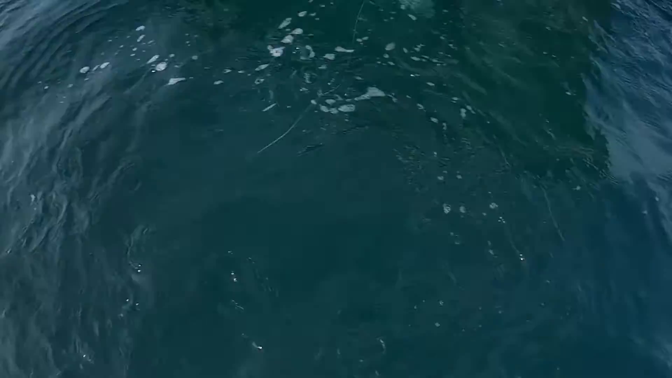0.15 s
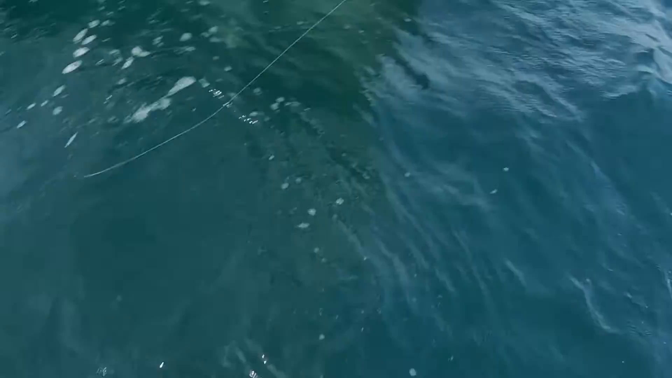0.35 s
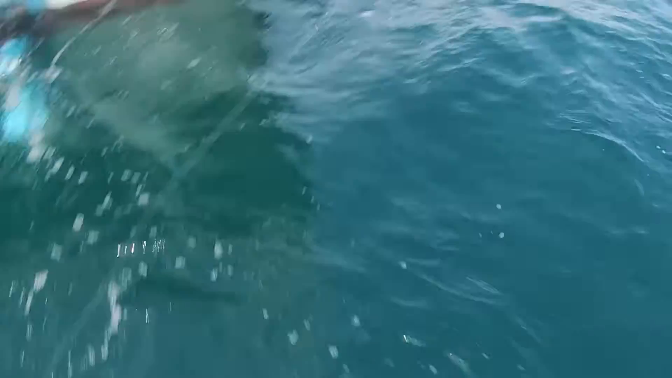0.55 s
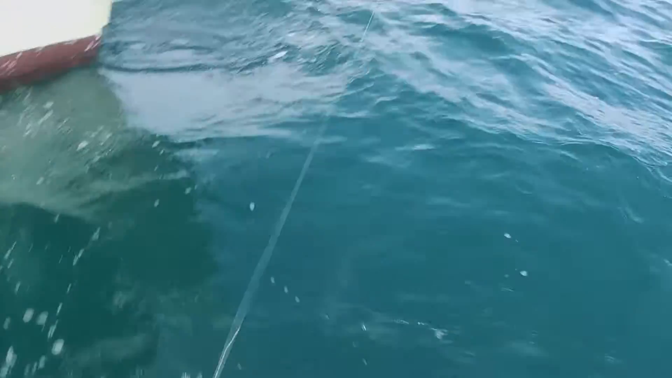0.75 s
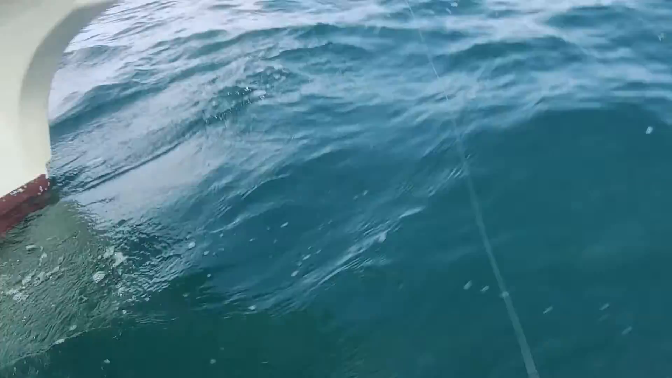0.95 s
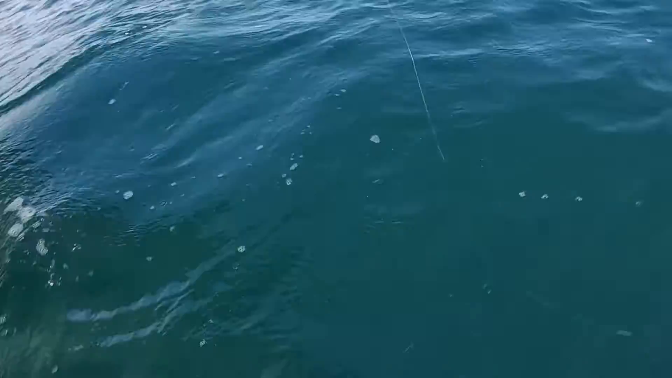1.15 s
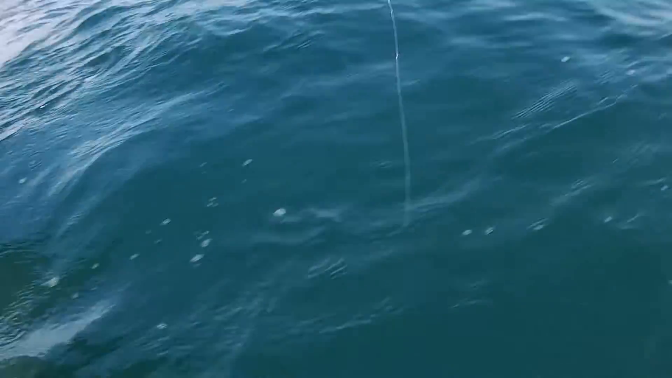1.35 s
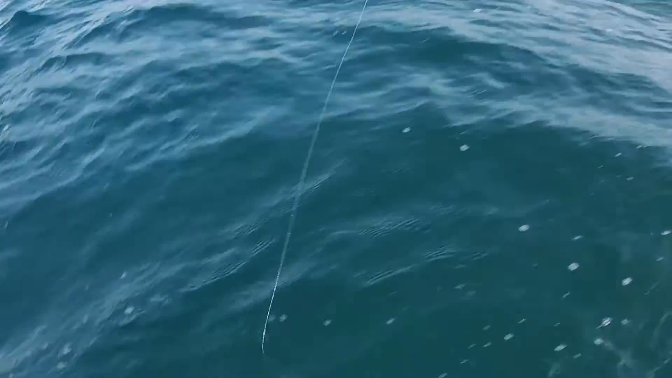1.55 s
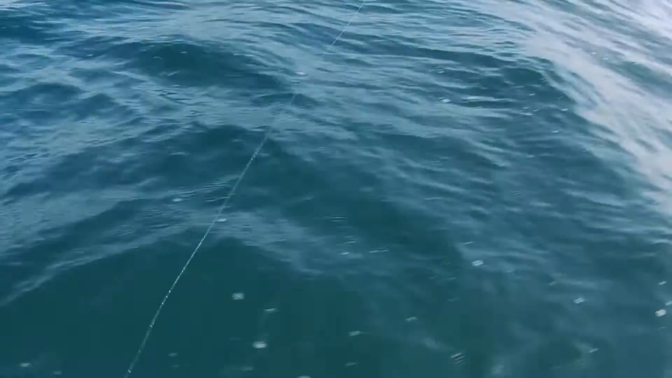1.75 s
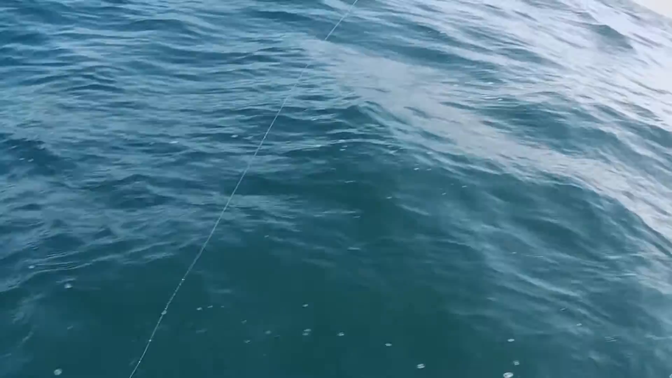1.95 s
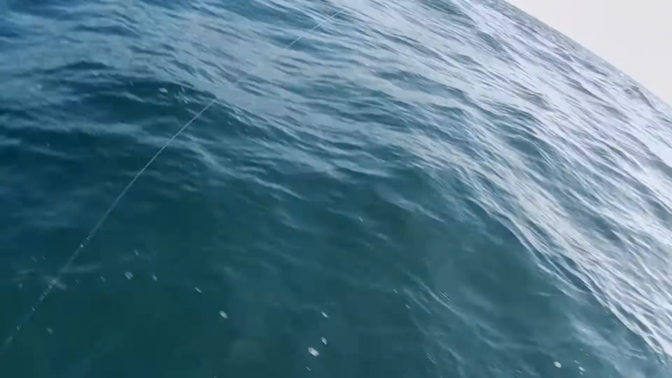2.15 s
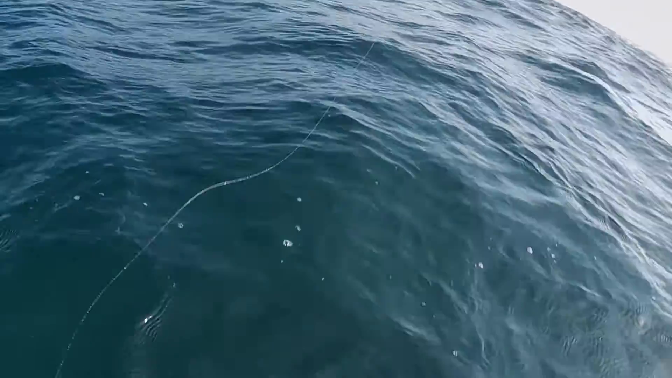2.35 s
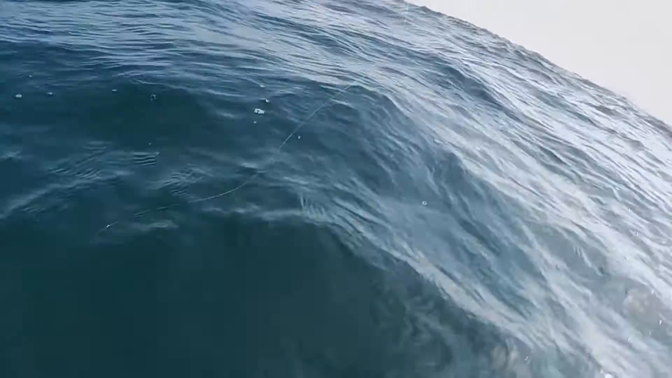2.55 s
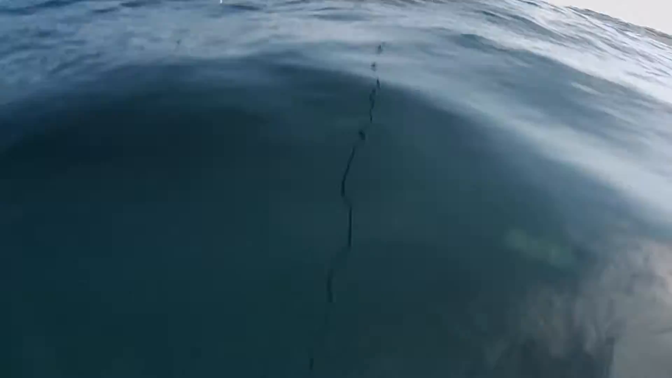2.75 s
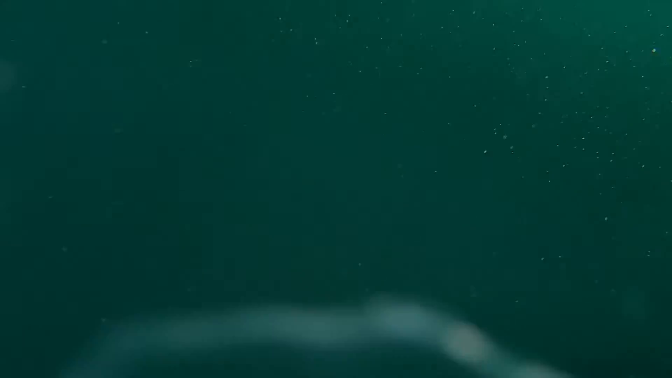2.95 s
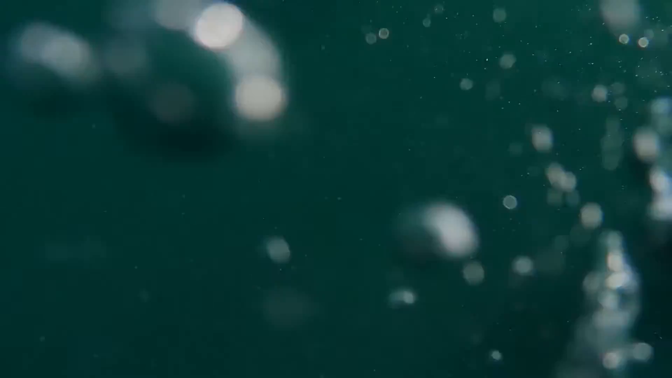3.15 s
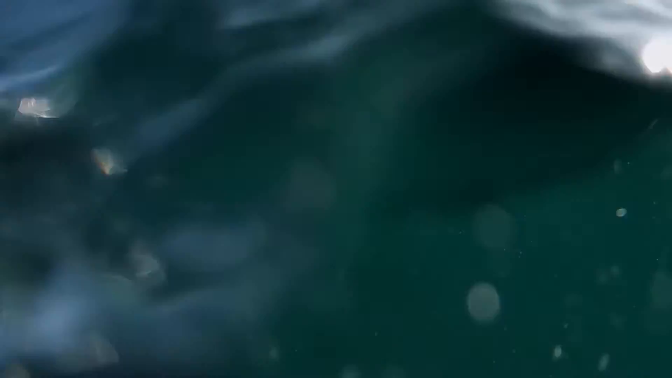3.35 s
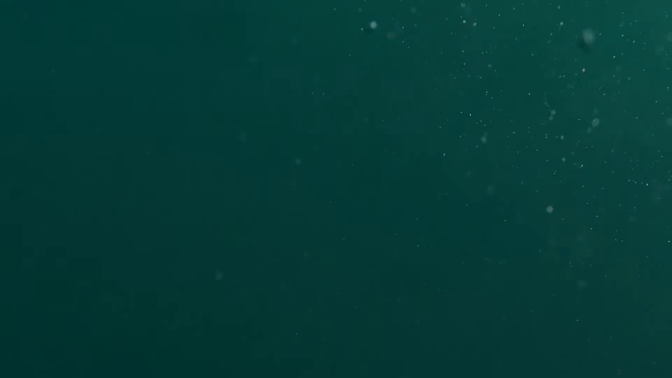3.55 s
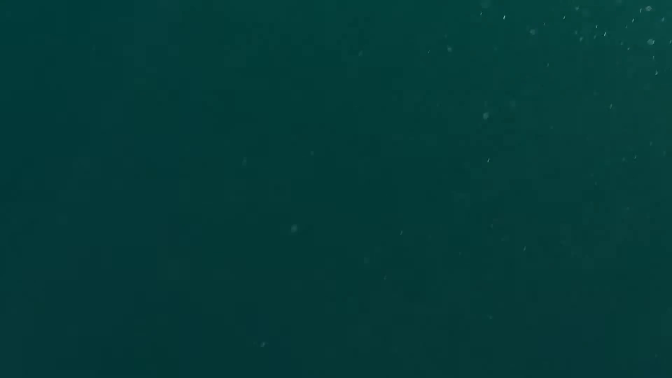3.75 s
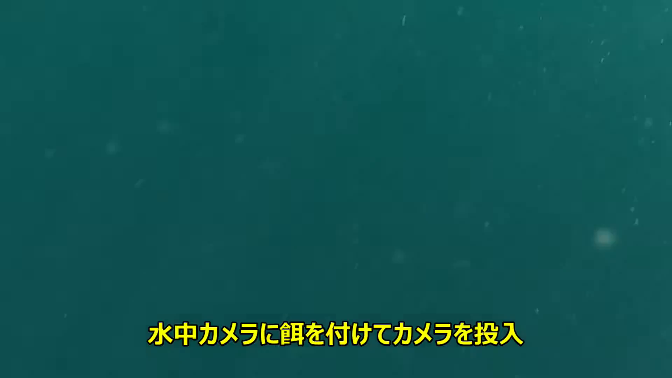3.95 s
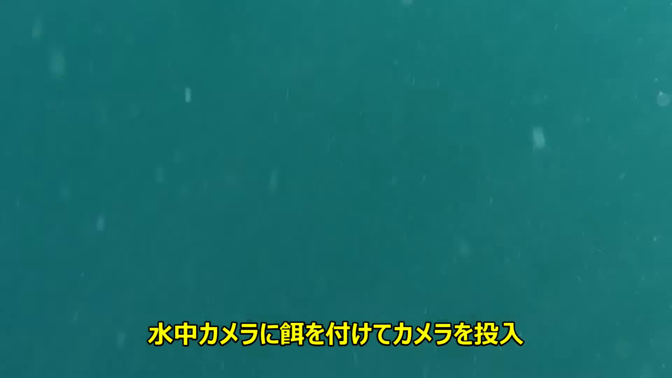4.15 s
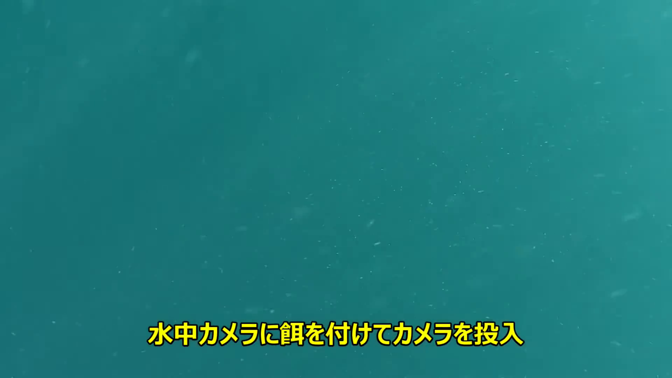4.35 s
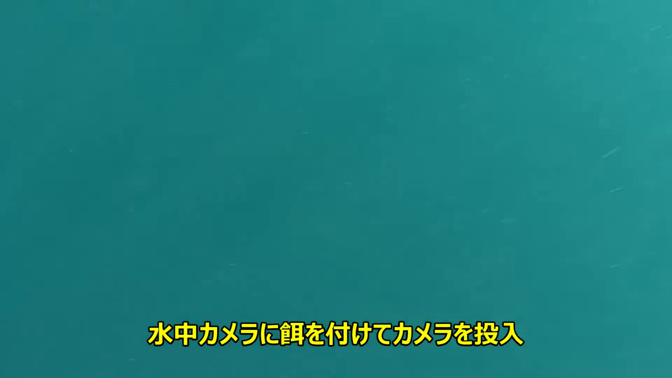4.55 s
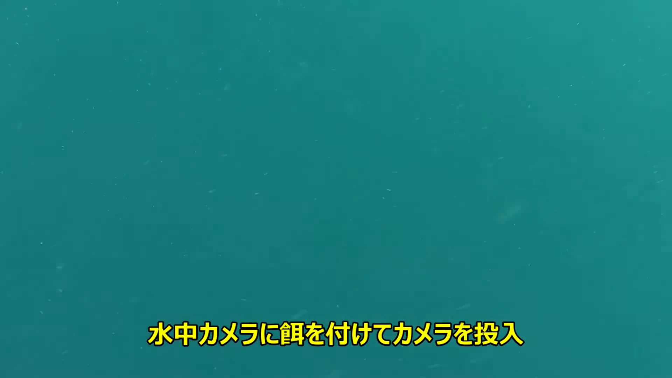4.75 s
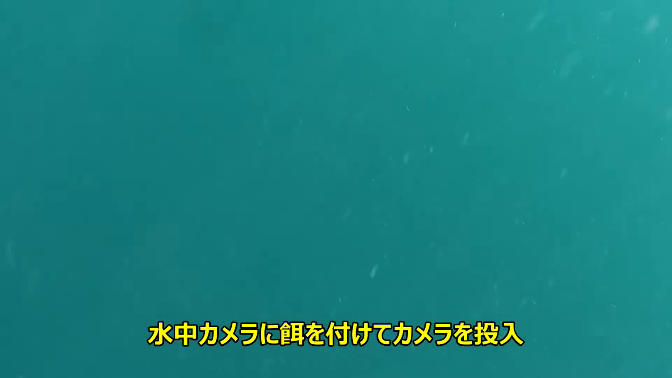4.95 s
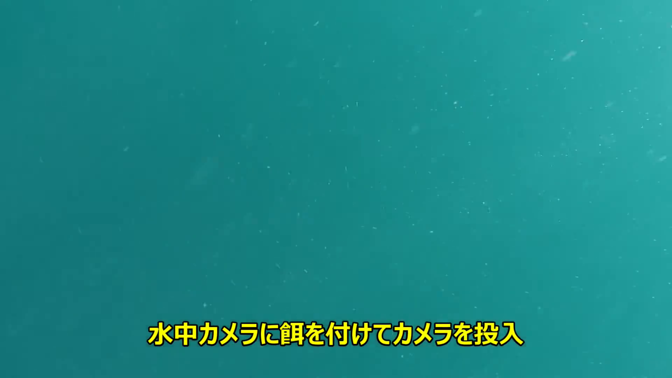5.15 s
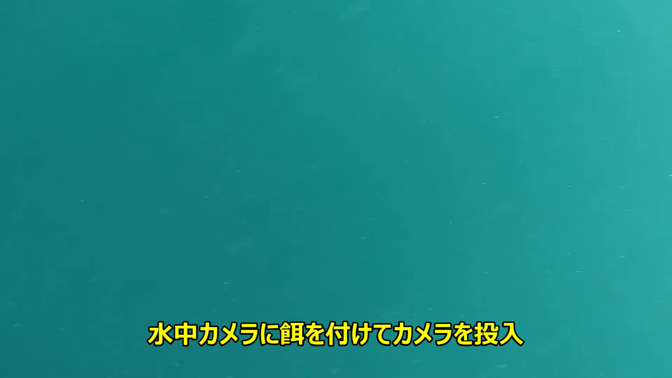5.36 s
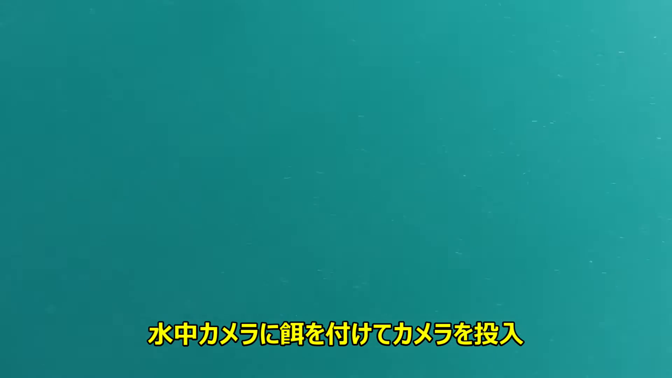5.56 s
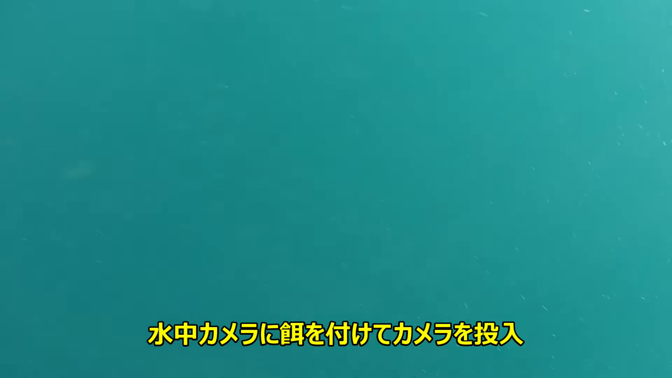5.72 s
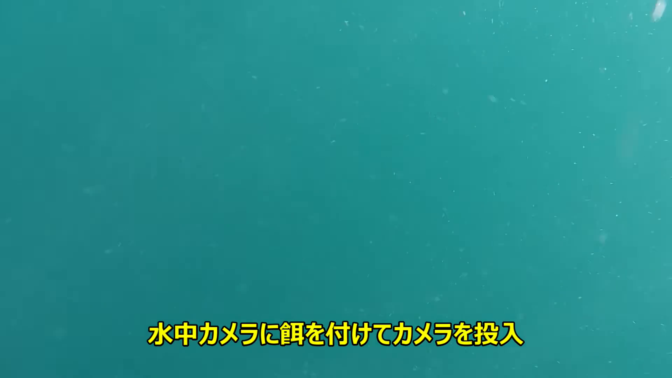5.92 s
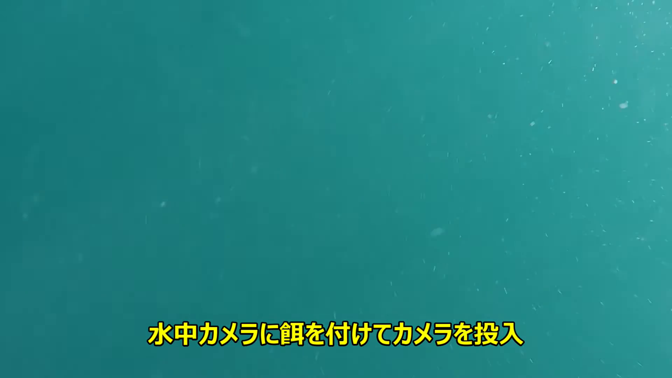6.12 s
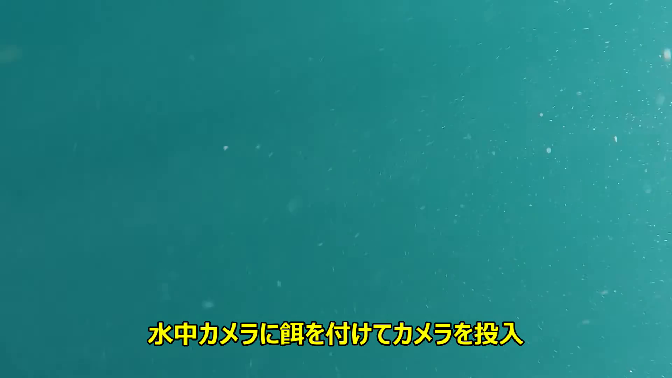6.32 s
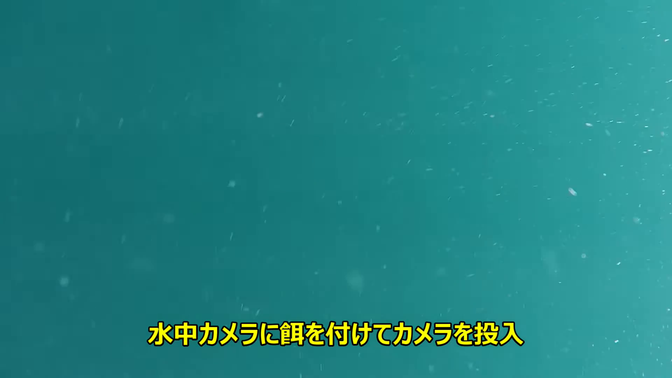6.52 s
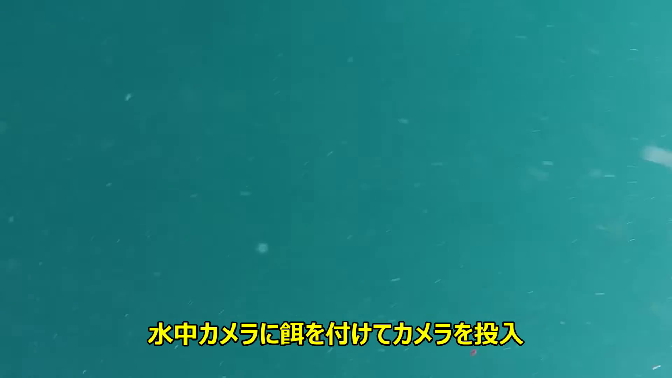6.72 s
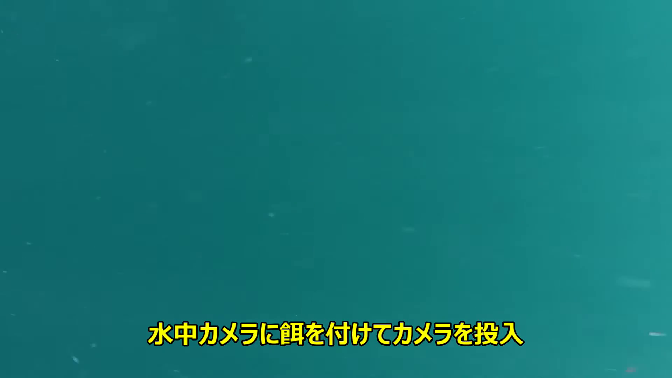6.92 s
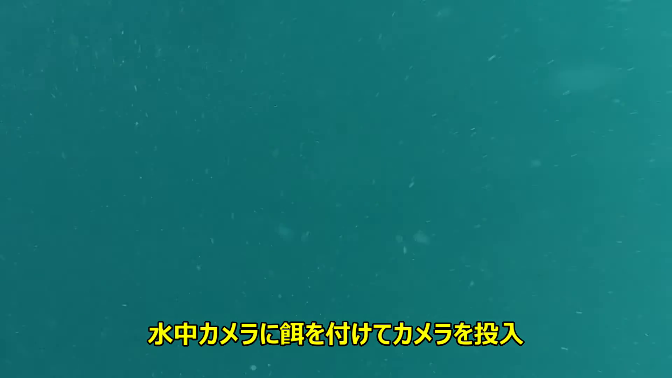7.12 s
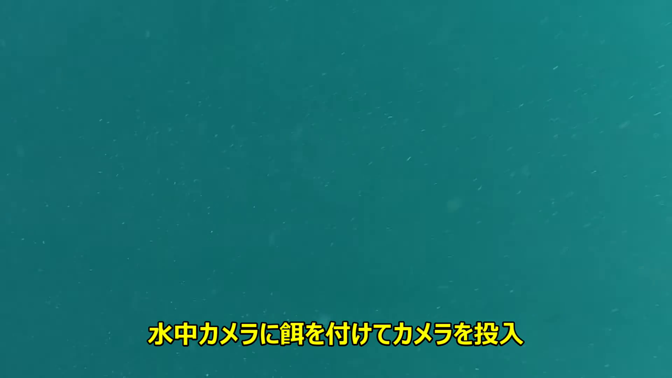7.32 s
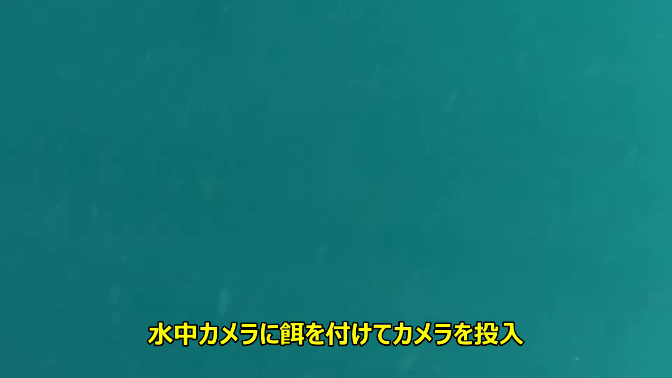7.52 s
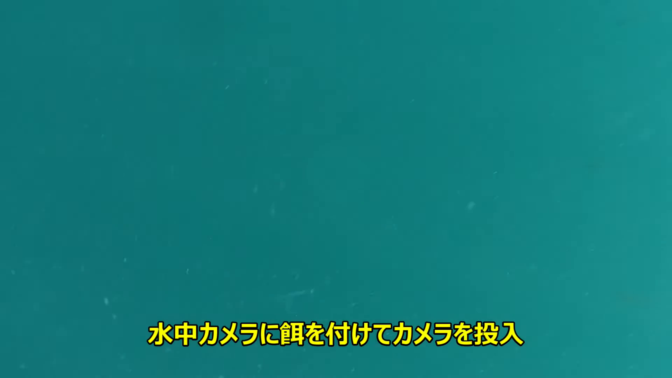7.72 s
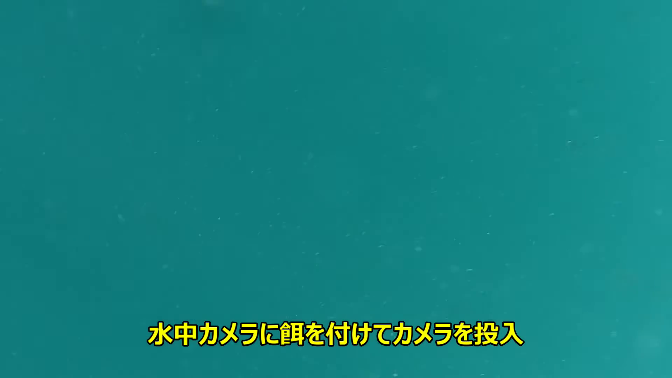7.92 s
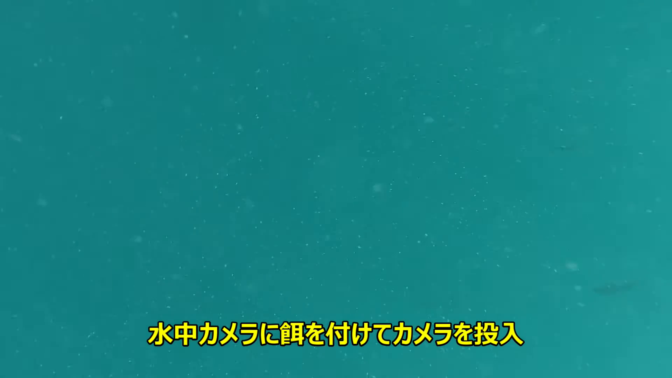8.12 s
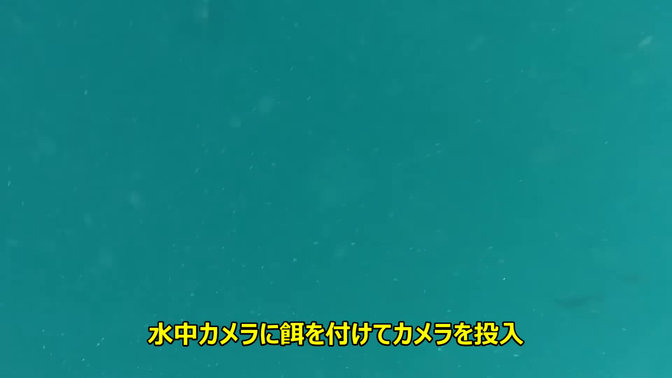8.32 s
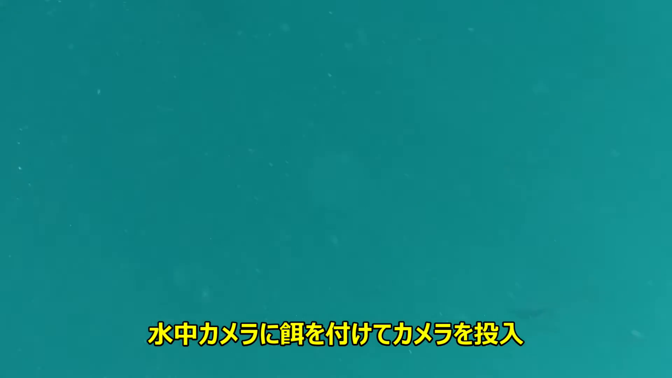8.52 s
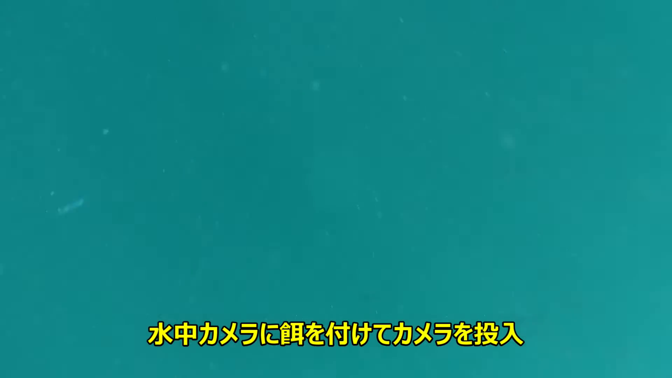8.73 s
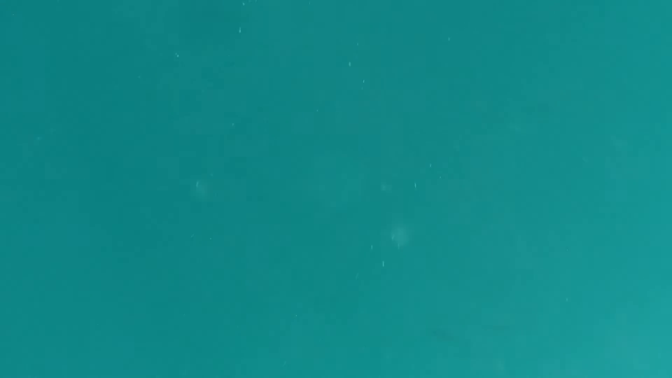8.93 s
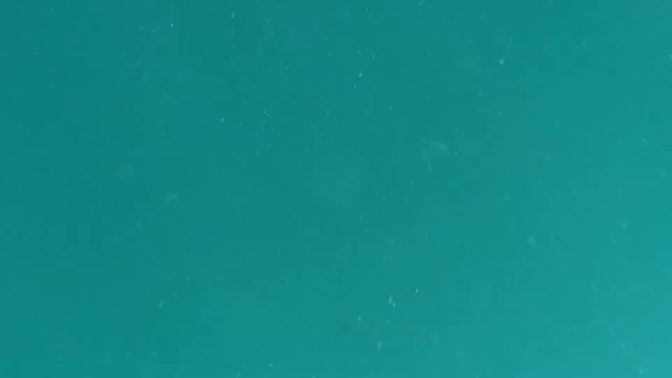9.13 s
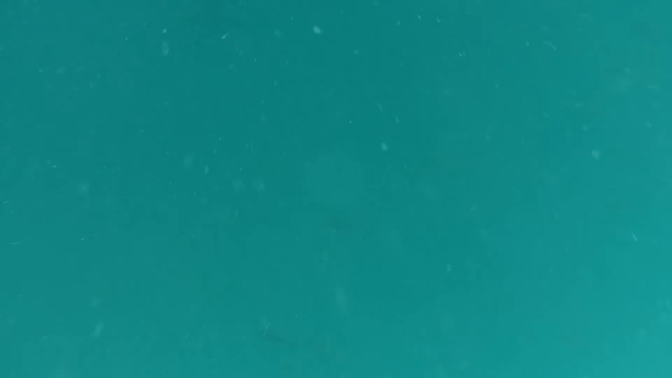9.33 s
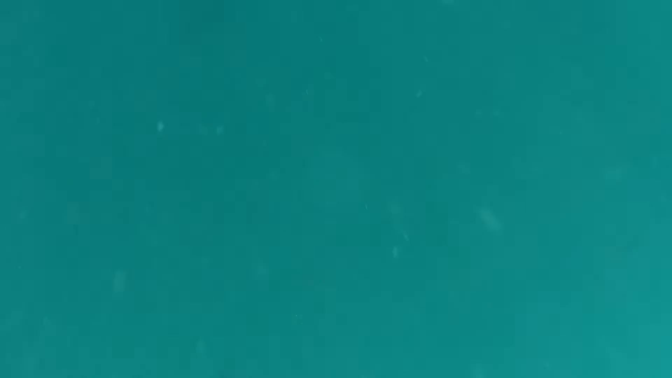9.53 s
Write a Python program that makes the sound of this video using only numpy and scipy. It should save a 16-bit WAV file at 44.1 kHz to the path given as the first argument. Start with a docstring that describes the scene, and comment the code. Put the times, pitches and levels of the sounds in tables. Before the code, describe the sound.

Faint line ticks and tackle knocks, a loud close splash into open water, then muffled hollow judders and creaks as the housing sinks.

```python
"""Open water: a camera in a waterproof housing is lowered on a line and drops into the sea.
In the air, friction noise and short jerks ring the hanging rig, so the line rubs and ticks and tackle knocks.
At the surface, shaped noise slaps the housing, tuned bubbles gulp, fizz and plink, and a cavity rings.
Under water, random slips drive the resonances of the loaded rig: it hums, judders and creaks as line pays out."""
import sys
import numpy as np
from scipy import signal
from scipy.fft import rfft, irfft, next_fast_len
from scipy.io import wavfile
from scipy.ndimage import uniform_filter1d

SR = 44100
rng = np.random.default_rng(int(sys.argv[2]) if len(sys.argv) > 2 else 0)


def int16_out(signal):
    """Quantize to a 16-bit WAV file."""
    q = np.round(np.clip(np.atleast_2d(signal).T, -1, 1) * 32767)
    wavfile.write(sys.argv[1], SR, q.astype(np.int16))


N = 426888

# faint background hiss and rumble, as a spectral outline: (frequency_hz, level_db)
FLOOR_OUTLINE = [(15, -36.5), (30, -16.5), (90, -6), (250, -18.5), (550, -18), (1200, -22.5), (3400, -31.5),
                 (15000, -33.5)]
# the rig is lowered through the air: (start_s, line_rub_db, rig_sway_db)
LOWERING_LEVELS = [(0.07, -47, -43), (0.27, -50.5, -57.5), (0.54, -58.5, -66), (0.79, -47, -55.5),
                   (0.83, -51, -70), (0.87, -54, -60), (1.09, -45.5, -53), (1.24, -59, -46.5),
                   (1.45, -59, -60.5), (1.65, -53.5, -60), (1.83, -61.5, -48.5), (1.96, -73, -64),
                   (1.99, -79, -58.5), (2.33, -46.5, -69), (2.39, -52, -54), (2.54, -73, -91),
                   (2.73, -55, -73), (2.9, -60, -63)]
# the loudest slips of the line in the air: (start_s, level_db, treble_share_db, t60_s)
AIR_LINE_TICKS = [(0.066, -24, 4, 0.074), (0.07, -22.5, 6, 0.094), (0.087, -25.5, -20, 0.11),
                  (0.126, -26.5, 14, 0.023), (0.167, -29.5, -46, .035), (0.346, -36.5, -38, 0.046),
                  (0.447, -40.5, -13, 0.18), (0.48, -37, -15, 0.13), (0.592, -38, -8, 0.054),
                  (0.635, -36, -11, 0.063), (0.668, -34, -10, 0.055), (0.717, -32.5, -6, 0.043),
                  (0.757, -32.5, -1, 0.037), (0.788, -35.5, -8, 0.069), (0.837, -37, -10, 0.041),
                  (0.874, -29.5, -5, 0.039), (0.914, -32.5, -29, 0.02), (0.962, -19.5, 0.5, 0.033),
                  (0.981, -29.5, -14, .031), (1.0, -35, -10, 0.028), (1.028, -39, 1, 0.049),
                  (1.069, -40, 7, 0.018), (1.108, -36, -1, 0.21), (1.228, -31.5, -3, 0.054),
                  (1.29, -39, -2, 0.053), (1.49, -42, -9, 0.077), (1.554, -26.5, 0, 0.044),
                  (1.619, -35.5, -37, 0.045), (2.18, -44.5, -12, 0.2), (2.281, -38, -19, 0.013),
                  (2.325, -43, 2, 0.041), (2.368, -27.5, -35, 0.032), (2.455, -33.5, -2.5, 0.036),
                  (2.793, -34.5, -4, 0.089), (2.829, -34, -11, 0.1)]
# tackle knocking on the frame: (start_s, level_db, clack_share_db)
TACKLE_KNOCKS = [(1.117, -34, -12), (1.183, -26.5, -7), (1.209, -26, -13), (1.234, -29, -26),
                 (1.706, -26, -6), (1.789, -33.5, -16), (1.821, -28.5, -10), (1.908, -43.5, -7),
                 (1.946, -42, -7), (1.989, -33.5, -23), (2.073, -33.5, -16), (2.369, -52, 2)]
# resonances of the rig rubbed in air, its frame, and the hanging rig: (pitch_hz, width_hz, level_db)
AIR_RESONANCES = [(724, 75, 2), (924, 49, 5.5), (1053, 110, 5), (1268, 73, 3), (1544, 43, -3.5),
                  (1866, 68, -5), (2130, 84, -10.5), (2985, 150, -13.5), (2860, 220, -27),
                  (3200, 130, -18.5), (3722, 140, -21), (4220, 180, -20.5), (4640, 150, -24.5),
                  (5480, 160, -23.5), (5566, 380, -28), (6100, 150, -31.5)]
FRAME_RESONANCES = [(85, 4.8, -19), (114, 37, -5.5), (170, 64, -6.5), (317.5, 17, -8.5), (375, 28, -18.5),
                    (695, 69, -4.5), (760, 77, -8.5), (1190, 270, -28), (1400, 113, -20.5), (1790, 66, -35)]
HANGING_RESONANCES = [(45.2, 56, -11.5), (79.2, 8.6, 4), (108, 41, -5)]
# dense overtones of the rub in air and under water, as spectral outlines: (frequency_hz, level_db)
AIR_OVERTONES = [(150, -46), (250, -6), (371, 11.5), (448, -7), (664, 12.5), (1270, 9.5), (1460, -12),
                 (2480, -15.5), (3160, -8.5), (3940, -22.5), (4370, -64.5), (6820, -49), (15000, -41)]
WET_OVERTONES = [(350, -18.5), (600, -6.5), (911, -14), (1260, 5.5), (1400, -12), (1760, -7), (1940, -14),
                 (4290, -13.5), (4970, -8.5), (6690, -20), (15000, -34.5)]

# the line scrapes along the frame under water: (start_s, length_s, level_db)
SCRAPE_STROKES = [(3.6, .12, -52.5), (3.95, 0.22, -49), (4.715, 0.021, -60), (5.3, 0.056, -59.5),
                  (5.81, .09, -64), (5.9, 0.074, -56.5), (6.05, 0.022, -56.5), (6.55, 0.34, -53),
                  (7.02, .08, -65), (7.29, 0.054, -59.5), (7.55, 0.08, -56), (8.11, .09, -57),
                  (8.31, 0.064, -53.5), (8.45, 0.14, -55.5), (8.77, .48, -52.5), (9.27, 0.049, -65)]
# the loudest slips of the line under water: (start_s, level_db, treble_share_db, t60_s)
WET_LINE_TICKS = [(3.9496, -19, -6, 0.055), (3.9868, -29.5, 12, 0.043), (4.01, -26.5, -37, 0.027),
                  (4.0938, -29, -4, 0.055), (4.1654, -29.5, -16, 0.044), (4.732, -47.5, -18, 0.032),
                  (5.376, -45, -1, 0.027), (5.943, -39.5, -13, 0.039), (5.985, -43.5, 0, 0.056),
                  (6.552, -33, 6, 0.024), (6.5834, -34.5, -3, .022), (6.631, -29, -12, 0.048),
                  (6.694, -40, -3, 0.12), (6.7386, -39.5, -9, 0.05), (6.822, -25, 14, 0.037),
                  (6.8509, -31.5, 1, 0.049), (6.9316, -33.5, -4, 0.038), (8.0425, -39, -8, 0.044),
                  (8.114, -35.5, 0, 0.027), (8.212, -48.5, 4, 0.036), (8.5381, -34, -4, 0.036),
                  (8.792, -45, 3, 0.094), (8.8205, -36, 0, 0.084), (8.8468, -30, -4, 0.029),
                  (8.8887, -18, 1.5, 0.017), (8.9139, -32, -1, .049), (9.004, -36, 2, 0.038),
                  (9.1, -35, -4, 0.12), (9.1511, -30.5, -2, 0.027), (9.2036, -37.5, -3, 0.039),
                  (9.3614, -41, -28, 0.064)]
# steady drag of the water on the sinking rig: (start_s, sway_db, judder_db, housing_ring_db)
WATER_DRAG = [(3.65, -59, -60, -63), (3.75, -54, -58, -47), (4.04, -60, -53, -40), (4.24, -72, -68, -62),
              (4.67, -81.5, -82, -66.5), (5.01, -66.5, -72, -65.5), (5.33, -69, -82.5, -61.5),
              (5.68, -54, -62, -61.5), (6.13, -62.5, -53, -49.5), (6.77, -44, -54.5, -44.5),
              (7.09, -51, -63.5, -53.5), (7.66, -51.5, -67, -60), (7.91, -53.5, -57.5, -55),
              (8.74, -58, -62, -61.5), (9.06, -50.5, -55.5, -48), (9.24, -45, -59, -62),
              (9.41, -56, -72, -58), (9.68, -70, -76.5, -75.5)]
# the line comes taut and pulls at the rig: (start_s, length_s, sway_db, judder_db, housing_ring_db)
LINE_PULLS = [(3.598, 0.063, -36, -53, -43), (3.683, .035, -43, -44, -48),
              (3.833, 0.033, -37.5, -47, -38.5), (3.877, 0.12, -42, -44.5, -36.5),
              (4.059, 0.15, -43.5, -47.5, -41), (4.422, 0.03, -62, -58.5, -56),
              (4.706, 0.046, -83.5, -83, -47.5), (4.884, 0.14, -56, -49.5, -48),
              (5.028, 0.065, -60, -49, -47), (5.342, 0.035, -55, -55.5, -46.5),
              (5.477, 0.096, -54, -49.5, -46.5), (5.576, 0.067, -46, -47.5, -50),
              (5.639, 0.025, -42, -59, -49.5), (5.797, .1, -62, -38.5, -40), (5.923, 0.14, -52, -43.5, -40),
              (6.153, 0.083, -57, -51, -43), (6.27, 0.04, -60, -58, -42.5),
              (6.375, .085, -53, -50.5, -37.5), (6.536, 0.064, -34.5, -44, -39),
              (6.621, 0.053, -41, -58, -33), (6.809, 0.072, -42, -55, -37), (7.078, 0.064, -47, -61, -45),
              (7.215, 0.054, -54, -55.5, -54), (7.263, 0.092, -45, -61, -49.5),
              (7.353, 0.065, -41, -55, -59), (7.485, .14, -35.5, -54, -49.5),
              (7.73, 0.098, -39.5, -56.5, -52.5), (8.004, 0.087, -38, -55, -63),
              (8.111, 0.039, -59, -69, -43), (8.266, 0.061, -31.5, -46, -39.5), (8.43, 0.21, -41, -57, -73),
              (8.749, .1, -44, -69, -64), (8.867, 0.052, -59, -43.5, -38.5),
              (9.063, 0.12, -35.5, -54, -39.5), (9.192, 0.15, -37.5, -60, -58),
              (9.636, 0.066, -47, -55.5, -52)]
# sharp tugs of the line under water: (start_s, level_db, housing_ring_share_db)
LINE_TUGS = [(3.831, -29, -6), (3.892, -25, 3.5), (4.435, -41, -6.5), (5.164, -33.5, -16),
             (5.588, -28.5, -8.5), (5.806, -42, 6), (5.885, -33.5, 4.5), (6.557, -27.5, -7),
             (6.581, -24, 2), (6.633, -26, 1), (8.277, -37.5, 7.5), (8.452, -43, -12), (8.89, -22, 18)]
# resonances under water: scraped rig, deep sway, judder, housing ring, tug: (pitch_hz, width_hz, level_db)
WET_RESONANCES = [(481, 21.8, 17.5), (636, 44, 10.5), (771, 51, 6.5), (1034, 21, 6.5), (1147, 15, -12.5),
                  (1807, 67, 5), (2070, 58, -4), (2374, 145, -0.5), (2790, 57, -0.5), (3055, 76, 0.5),
                  (3240, 360, -10.5), (3470, 174, -5.5), (3945, 190, -9.5), (5270, 130, -31),
                  (5650, 38, -24), (6970, 71, -51), (8670, 300, -23.5)]
SWAY_RESONANCES = [(90.1, 8.85, -3), (70.8, 30.3, -12)]
JUDDER_RESONANCES = [(143, 55, 0.5), (250, 26, -0.5), (334.8, 22.5, -2.5)]
RING_RESONANCES = [(472.7, 22.2, 6.5), (525.3, 15.2, 6), (641, 86, -13.5)]
TUG_RESONANCES = [(79.5, 37.4, -6.5), (125, 53.4, -8), (233, 77, -18), (328, 146, -21)]
# gurgles slipping past the housing: (start_s, level_db)
GURGLE_STARTS = [(5.935, -53), (6.06, -57.5), (6.259, -54.5), (6.4, -58)]

# white water round the housing: (start_s, spray_db, churn_db)
SPLASH_LEVELS = [(2.91, -55.5, -67), (2.964, -56, -57), (3.042, -56.5, -40), (3.094, -53, -35.5),
                 (3.134, -57, -36), (3.242, -48, -46.5), (3.352, -59.5, -61.5), (3.422, -83, -58),
                 (3.594, -53, -74), (3.7, -74, -37.5)]
# water draining over the lid between the splashes: (start_s, level_db)
TRICKLE_LEVELS = [(3.24, -47), (3.29, -65), (3.372, -57), (3.436, -55), (3.46, -37.5), (3.52, -85)]
# water slapping the housing: (start_s, level_db, treble_share_db, t60_s)
WATER_SLAPS = [(2.9147, -17, -9.5, 0.075), (2.9215, -12, -3, 0.021), (2.9288, -13.5, -4, 0.037),
               (2.9396, -11, -4, 0.046), (2.9653, -16.5, -8.5, 0.011), (2.9767, -22.5, 0, 0.073),
               (2.999, -21.5, -12.5, 0.079), (3.0244, -14, -18, .07), (3.03, -28, -1, 0.015),
               (3.0538, -23.5, -4, .061), (3.085, -30.5, -4.5, 0.047), (3.1593, -28, -2.5, 0.025),
               (3.172, -24.5, 9, 0.041), (3.198, -15, 2, 0.0058), (3.2051, -18.5, 1.5, 0.043),
               (3.59, -20, -10.5, 0.021), (3.6045, -23.5, -12, 0.054), (3.622, -25.5, -19, 0.1),
               (3.6494, -31.5, 0, 0.028)]
# colour of the spray, as a spectral outline: (frequency_hz, level_db)
SPRAY_OUTLINE = [(25, -20), (50, 1), (120, -2.5), (300, -7.5), (900, -4), (1800, -9.5), (3000, -10),
                 (4600, -13), (6500, -20.5), (9000, -25), (12000, -32), (16000, -38.5)]
# the air cavity that opens behind the housing and closes again: (start_s, pitch_hz, level_db)
CAVITY_PATH = [(2.925, 1150, -40.5), (2.95, 941, -34.5), (2.993, 770.6, -34), (3.036, 400.3, -25.5),
               (3.09, 402.8, -45.5), (3.158, 537.5, -38.5), (3.26, 542, -53), (3.37, 995, -46),
               (3.42, 1080, -69)]
# large air pockets pinching off: (start_s, level_db, pitch_hz, t60_s, shove_share_db)
POCKET_GULPS = [(2.939, -36, 920, .031, -20), (2.985, -18.5, 738, 0.073, -21), (3.005, 2.5, 518, 0.014, -6),
                (3.025, -2.5, 384, 0.052, -6.5), (3.055, -15, 335, 0.05, -4), (3.112, -22, 589, 0.11, 0),
                (3.145, -27, 580, 0.07, -16), (3.172, -24.5, 647, 0.31, 8.5), (3.197, -2, 551, 0.052, -50),
                (3.244, -22.5, 482, .03, -15), (3.268, -28, 603, 0.049, -6), (3.565, -58, 424, 0.087, 26),
                (3.59, -28.5, 877, 0.054, -30), (3.625, -22, 1140, 0.069, -0.5),
                (3.714, -20.5, 566, 0.09, -1.5), (4.008, -19.5, 577, .057, -18)]
# droplets and small bubbles: (start_s, level_db, pitch_hz, t60_s)
DROPLET_PLINKS = [(2.999, -21, 2080, 0.013), (3.028, -13, 1500, 0.014), (3.027, -18, 2150, 0.011),
                  (3.088, -25, 1114, 0.045), (3.147, -32, 1770, 0.027), (3.16, -42, 4300, 0.01),
                  (3.255, -29.5, 2973, 0.0067), (3.274, -31, 2138, 0.014), (3.286, -33, 2320, 0.011),
                  (3.314, -42, 2700, 0.013), (3.331, -34.5, 1830, 0.039), (3.334, -46, 4240, 0.017),
                  (3.364, -28.5, 4200, 0.0091), (3.363, -35, 1630, 0.027), (3.382, -35.5, 3940, 0.016),
                  (3.393, -37, 970, 0.042), (3.41, -37, 1420, 0.012), (3.448, -37, 1730, 0.039),
                  (3.46, -35, 1210, 0.05), (3.45, -47, 1897, 0.18), (3.549, -19.5, 2090, 0.017),
                  (3.549, -25, 1210, 0.015), (3.592, -20.5, 1430, 0.0036), (3.623, -22.5, 2560, 0.003),
                  (3.725, -36.5, 3820, 0.017), (3.765, -34, 2750, 0.0084), (3.776, -25, 1440, 0.022),
                  (4.546, -50.5, 1783, 0.053), (5.379, -41, 1783, 0.043)]

FLOOR_DB = -69
CONTACT_SPREAD_DB = 2   # each slip strikes the modes a little differently
CRACKLE_PER_S, CRACKLE_DB = 100, -3.5   # grit caught under the scraping line
IDLE_SCRAPE_DB = -18   # the line's light rub between scrapes, against the housing's ring
SCRAPE_ATTACK_S, SCRAPE_SAG_DB_PER_S, SCRAPE_RELEASE_S = 0.0067, -1.5, 0.04   # negative sag: it swells
PULL_ATTACK_S, PULL_SAG_DB_PER_S = 0.02, 28
SWAY_RELEASE_S, JUDDER_RELEASE_S, RING_RELEASE_S = 0.033, 0.011, 0.0074
SUBMERGED_S, RING_START_SHARP, RING_SETTLE_S = 3.7, 0.13, 0.9   # start sharp: share of the resting pitch
GURGLE_S, GURGLE_ATTACK_S, GURGLE_RELEASE_S = 0.025, 0.014, 0.018
BUFFET_DB = -4   # the churn shakes the rig, against its own level
QUIET_DB, QUIET_KNEE_DB, SUPPRESS_DB, SUPPRESS_ABOVE_HZ = -47, 15.5, 5.5, 500
START_S, CUTOFF_HZ = 0.065, 15900


def from_db(db):
    """Decibels to gain."""
    return 10 ** (np.asarray(db) / 20)


def rms_one(x):
    """Scale to rms 1."""
    return x / np.sqrt(np.mean(x ** 2) + 1e-20)


def crest_one(x):
    """Scale to a peak near 1: the loudest three milliseconds get rms one half."""
    return 0.5 * x / np.sqrt(uniform_filter1d(x * x, size=132).max() + 1e-20)


def evened(x, span_s):
    """Hold the running rms near 1, keeping the faster grain."""
    size = max(int(span_s * SR), 8)
    power = uniform_filter1d(uniform_filter1d(x * x, size), size)
    return x / np.sqrt(np.abs(power) + 1e-4 * np.mean(x * x))


def gains(rows):
    """One gain curve per dB column, fading quickly outside the rows."""
    s, *columns = np.transpose(rows)
    t = np.arange(N) / SR
    outside = np.maximum(s[0] - t, 0) + np.maximum(t - s[-1], 0)
    return [from_db(np.interp(t, s, c)) * np.exp(-outside / 0.0037) for c in columns]


def strokes(rows, attack_s, sag_db_per_s, release_s):
    """Gain of (start_s, length_s, level_db) strokes: each rises, drifts by its sag, then dies away."""
    out, t = np.zeros(N), np.arange(SR) / SR
    for s, length, db in rows:
        rise = np.minimum(t / max(attack_s, 0.001), 1)
        release = np.exp(-np.maximum(t - length, 0) / release_s)
        add(out, s, from_db(db - sag_db_per_s * t) * rise * release)
    return out


def cut(x, hz, kind, order=2):
    """Butterworth low- or high-pass."""
    return signal.sosfilt(signal.butter(order, min(hz, 0.45 * SR), kind, fs=SR, output="sos"), x)


def coloured(x, outline):
    """Shape by a (frequency_hz, level_db) outline, with minimum phase so that nothing sounds early."""
    hz, db = np.transpose(outline)
    size = 2 * next_fast_len(len(x) // 2 + 1)
    f = np.maximum(np.abs(np.fft.fftfreq(size, 1 / SR)), 1)
    log_gain = np.log(from_db(np.interp(np.log(f), np.log(hz), db)))
    response = np.exp(np.conj(signal.hilbert(log_gain)))[:size // 2 + 1]
    return irfft(rfft(x, size) * response, size)[:len(x)]


def tilted(x, split_hz, treble_db):
    """Set the treble's share against the rest."""
    low = crest_one(cut(x, split_hz, "low"))
    high = crest_one(cut(x, split_hz, "high"))
    return crest_one(low - from_db(treble_db) * high)


def body(force, modes):
    """A struck or rubbed body: parallel resonances of alternating sign."""
    out = 0
    for k, (hz, width, db) in enumerate(modes):
        r = np.exp(-np.pi * width / SR)
        poles = [1, -2 * r * np.cos(2 * np.pi * hz / SR), r * r]
        ringing = (1 - r * r) / 2 * signal.lfilter([1, 0, -1], poles, force + 1e-18)
        out = out + (-1) ** k * from_db(db) * ringing
    return out


def slips(per_s, spread_db):
    """Clicks at random moments, of uneven size and sign."""
    sizes = from_db(spread_db * np.minimum(rng.exponential(1, N), 4))
    return (rng.random(N) < per_s / SR) * sizes * rng.choice([-1, 1], N)


def rasp(per_s, spread_db, fade_s, steady):
    """Friction: each slip sets off a short burst of fine grain, over a steady rub."""
    fade = np.exp(-1 / (fade_s * SR))
    bursts = signal.lfilter([1], [1, -fade], np.abs(slips(per_s, spread_db)) + 1e-18)
    return (rms_one(bursts) + steady) * rng.standard_normal(N)


def event_time():
    """The time axis of one short event, in seconds."""
    return np.arange(SR // 4) / SR


def dying(t60):
    """An envelope falling 60 dB in t60 seconds."""
    return from_db(-60 * event_time() / max(t60, 0.002))


def grit(t60):
    """A burst of dying noise."""
    return rng.standard_normal(SR // 4) * dying(t60)


def add(out, s, sound):
    """Mix a sound in at time s."""
    i = max(round(s * SR), 0)
    out[i:i + len(sound)] += sound[:N - i]


def ticks(rows, modes, overtones, release_db, crack_db, split_hz, tail_db, tail_t60):
    """The line jerks loose and skids; modes and dense overtones ring and leave a faint rattle."""
    out = np.zeros(N)
    for s, db, treble_db, t60 in rows:
        suddenness = np.exp(-(t60 / 0.044) ** 2)   # short slips start with a jerk, long skids swell
        swell = 1 - (1 - suddenness) * np.exp(-event_time() / (0.014 * t60))
        force = swell * (grit(t60) + from_db(tail_db) * grit(tail_t60))
        force[0] += from_db(release_db) * suddenness
        struck = [(hz, width, mode_db + CONTACT_SPREAD_DB * rng.standard_normal())
                  for hz, width, mode_db in modes]
        ring = crest_one(body(force, struck))
        crack = crest_one(coloured(force, overtones))
        tick = ring + from_db(crack_db) * crack
        add(out, s + 0.001, from_db(db) * tilted(tick, split_hz, treble_db))
    return out


def blows(rows, low_modes, high_modes, rattle, rattle_t60):
    """A dull push with a little rattle rings the low modes, and the higher ones by a share of its own."""
    out = np.zeros(N)
    for s, db, high_db in rows:
        force = rattle * grit(rattle_t60)
        force[0] += 1
        thump = crest_one(body(force, low_modes))
        clack = crest_one(body(force, high_modes))
        add(out, s, from_db(db) * crest_one(thump + from_db(high_db) * clack))
    return out


def bubble(hz, t60, start_sharp, settle_s, rise_s):
    """An air pocket rings as a dying sine, starting sharp and settling on its pitch."""
    t = event_time()
    pitch = hz * (1 + start_sharp * np.exp(-t / settle_s))
    tone = np.sin(2 * np.pi * np.cumsum(pitch) / SR)
    return crest_one(tone * dying(t60) * (1 - np.exp(-t / rise_s)))


def bubble_cloud(low_hz, high_hz, per_s, cycles, count=10):
    """Many bubbles of different sizes, each ringing for a few cycles."""
    cloud = 0
    for hz in np.geomspace(low_hz, high_hz, count):
        cloud = cloud + body(slips(per_s / count, spread_db=7.5), [(hz, hz / cycles, 0)]) / np.sqrt(hz)
    return cloud


def background():
    """A faint hiss and rumble: steady noise under a fixed spectral outline."""
    return from_db(FLOOR_DB) * rms_one(coloured(rng.standard_normal(N), FLOOR_OUTLINE))


def gurgles():
    """Small clouds of bubbles break away and pass the housing."""
    rows = [(s, GURGLE_S, db) for s, db in GURGLE_STARTS]
    level = strokes(rows, GURGLE_ATTACK_S, 0, GURGLE_RELEASE_S)
    cloud = bubble_cloud(718, 1140, per_s=900, cycles=42)
    return level * evened(cut(cloud, 1450, "low", order=4), 0.029)


def rig_in_air():
    """The line rubs and ticks on the hanging housing, and tackle knocks on its frame."""
    rub, sway = gains(LOWERING_LEVELS)
    friction = rasp(per_s=130, spread_db=5.0, fade_s=0.0064, steady=0.15)
    overtones = rms_one(coloured(friction, AIR_OVERTONES))
    rubbing = rms_one(body(friction, AIR_RESONANCES)) + from_db(-5.5) * overtones
    swaying = cut(body(slips(per_s=210, spread_db=-2.0), HANGING_RESONANCES), 220, "low")
    clicks = ticks(AIR_LINE_TICKS, AIR_RESONANCES, AIR_OVERTONES, release_db=25.5, crack_db=-4,
                   split_hz=3040, tail_db=-17, tail_t60=0.29)
    knocks = blows(TACKLE_KNOCKS, FRAME_RESONANCES, AIR_RESONANCES, rattle=0.075, rattle_t60=0.08)
    return cut(rub * evened(rubbing, 0.05) + sway * evened(swaying, 0.044) + clicks + knocks, 7000, "low")


def line_under_water():
    """The line rubs lightly as the rig sinks, scrapes along the frame in strokes and creaks where it slips."""
    idle = from_db(IDLE_SCRAPE_DB) * gains(WATER_DRAG)[-1]
    stroke = strokes(SCRAPE_STROKES, SCRAPE_ATTACK_S, SCRAPE_SAG_DB_PER_S, SCRAPE_RELEASE_S)
    scrape = np.hypot(idle, stroke)
    grains = from_db(CRACKLE_DB) * rms_one(cut(slips(CRACKLE_PER_S, spread_db=3.0), 5000, "low"))
    friction = rms_one(rasp(per_s=140, spread_db=4, fade_s=0.0029, steady=0.22)) + grains
    overtones = rms_one(coloured(friction, WET_OVERTONES))
    scraping = rms_one(body(friction, WET_RESONANCES)) + from_db(-14) * overtones
    creaks = ticks(WET_LINE_TICKS, WET_RESONANCES, WET_OVERTONES, release_db=22.0, crack_db=-6.0,
                   split_hz=2340, tail_db=-19.5, tail_t60=0.25)
    return cut(scrape * evened(scraping, 0.032) + creaks, 7600, "low")


def settling(x):
    """The pitch of the ring sinks to its resting value as the housing goes down."""
    since = np.maximum(np.arange(N) / SR - SUBMERGED_S, 0)
    # reading faster than real time sounds higher; past the end it wraps round
    read = np.cumsum(1 + RING_START_SHARP * np.exp(-since / RING_SETTLE_S))
    return np.interp(read, np.arange(N), x, period=N)


def rig_under_water():
    """Drag and pulls drive the water-loaded rig: deep sway, judder and hollow ring; sharp tugs thump it."""
    starts, lengths, *pull_levels = np.transpose(LINE_PULLS)
    releases = (SWAY_RELEASE_S, JUDDER_RELEASE_S, RING_RELEASE_S)
    levels = []
    for drag, db, release_s in zip(gains(WATER_DRAG), pull_levels, releases):
        pulls = strokes(zip(starts, lengths, db), PULL_ATTACK_S, PULL_SAG_DB_PER_S, release_s)
        levels.append(np.hypot(drag, pulls))
    sway, judder, ring = levels
    force = slips(per_s=400, spread_db=4)
    swaying = cut(cut(body(force, SWAY_RESONANCES), 190, "low"), 63, "high")
    juddering = cut(body(force, JUDDER_RESONANCES), 635, "low", order=4)
    # bubbles slipping off the rig add wandering notes to its ring
    bubbles = rms_one(bubble_cloud(453, 686, per_s=60, cycles=27, count=6))
    notes = rms_one(body(force, RING_RESONANCES)) + from_db(-11) * bubbles
    ringing = settling(cut(notes, 814, "low", order=4))
    thumps = blows(LINE_TUGS, TUG_RESONANCES, RING_RESONANCES, rattle=0.085, rattle_t60=0.09)
    out = sway * evened(swaying, 0.045) + judder * evened(juddering, 0.04)
    return out + ring * evened(ringing, 0.069) + cut(thumps, 1200, "low")


def cavity():
    """The churning water rings the cavity: its pitch sinks as it grows and climbs as it closes."""
    s, hz, db = np.transpose(CAVITY_PATH)
    level, = gains(np.column_stack([s, db]))
    phase = 2 * np.pi * np.cumsum(np.interp(np.arange(N) / SR, s, hz)) / SR
    # slow noise on both quadratures makes a narrow band that follows the pitch
    in_phase, quadrature = cut(rng.standard_normal((2, N)), 70, "low")
    return level * evened(in_phase * np.cos(phase) + quadrature * np.sin(phase), 0.015)


def slaps():
    """Sheets of water slap the housing: a noise burst, coloured as spray, also rings trapped bubbles."""
    out = np.zeros(N)
    for s, db, treble_db, t60 in WATER_SLAPS:
        swell = 1 - np.exp(-event_time() / 0.0008)
        sheet = grit(t60) * swell * from_db(3.5 * rng.standard_normal(SR // 4))
        pitches = np.geomspace(900, 4800, 10) * np.exp(0.13 * rng.standard_normal(10))
        trapped = [(hz, hz / 25, 0) for hz in pitches]
        burst = crest_one(body(sheet, trapped))
        splat = crest_one(coloured(sheet, SPRAY_OUTLINE)) + from_db(-2.5) * burst
        add(out, s, from_db(db) * tilted(splat, 1500, treble_db))
    return out


def white_water():
    """Spray crackles over a churn of bubbles that buffets the rig, and water trickles off the lid."""
    spray, churn = gains(SPLASH_LEVELS)
    trickle, = gains(TRICKLE_LEVELS)
    crackle = rms_one(cut(coloured(slips(per_s=1900, spread_db=-1.0), SPRAY_OUTLINE), 6000, "low"))
    fizz = rms_one(bubble_cloud(950, 3400, per_s=990, cycles=17, count=14))
    spraying = cut(fizz, 4000, "low") + from_db(-12.5) * crackle
    churning = cut(bubble_cloud(370, 900, per_s=200, cycles=3.7), 1200, "low")
    buffeting = cut(body(slips(per_s=230, spread_db=2.5), HANGING_RESONANCES), 300, "low")
    trickling = cut(bubble_cloud(870, 1700, per_s=500, cycles=13), 2000, "low", order=6)
    out = spray * evened(spraying, 0.02) + churn * evened(churning, 0.059)
    out += from_db(BUFFET_DB) * churn * evened(buffeting, 0.04)
    return out + trickle * evened(trickling, 0.011)


def plinks():
    """A droplet plinks as a small ringing bubble; short-lived ones add a puff of noise just below their pitch."""
    out = np.zeros(N)
    for s, db, hz, t60 in DROPLET_PLINKS:
        puff = crest_one(cut(cut(grit(t60), 0.52 * hz, "high"), 0.95 * hz, "low", order=4))
        plink = bubble(hz, t60, start_sharp=0.075, settle_s=0.0013, rise_s=0.0078 * t60)
        puff_share = np.exp(-(t60 / 0.016) ** 2)   # long-lived bubbles ring clean
        add(out, s, from_db(db) * (plink + puff_share * puff))
    return out


def gulps():
    """Large air pockets ring as they pinch off, each with a low shove of water."""
    out = np.zeros(N)
    for s, db, hz, t60, shove_db in POCKET_GULPS:
        shove = bubble(hz=119, t60=0.021, start_sharp=1.7, settle_s=0.0017, rise_s=0.0012)
        gulp = bubble(hz, t60, start_sharp=0.025, settle_s=0.0019, rise_s=0.0004)
        add(out, s, -from_db(db) * (gulp + from_db(shove_db) * shove))
    return out


def scene():
    """The rig in air and under water, with the plunge between them, over a faint background, in mono."""
    rig = rig_in_air() + line_under_water() + rig_under_water()
    plunge = cavity() + white_water() + slaps() + plinks() + gulps()
    return (background() + gurgles() + rig + plunge)[None]


def suppressed(x):
    """A noise suppressor turns the treble down whenever the sound falls quiet."""
    level_db = 10 * np.log10(np.abs(uniform_filter1d(x * x, size=2205)) + 1e-12)
    quiet = np.clip((QUIET_DB - level_db) / QUIET_KNEE_DB, 0, 1)
    bass = cut(x, SUPPRESS_ABOVE_HZ, "low", order=1)
    return bass + from_db(-SUPPRESS_DB * quiet) * (x - bass)


def record(dry):
    """The sound starts a moment in; treble drops in the lulls, peaks clip at full scale, the top is cut."""
    running = np.arange(N) / SR >= START_S
    clipped = np.clip(suppressed(dry) * running, -1, 1)
    return signal.sosfilt(signal.ellip(10, 0.1, 80, CUTOFF_HZ, fs=SR, output="sos"), clipped)


dry = scene()
out = record(dry)
int16_out(out)
```